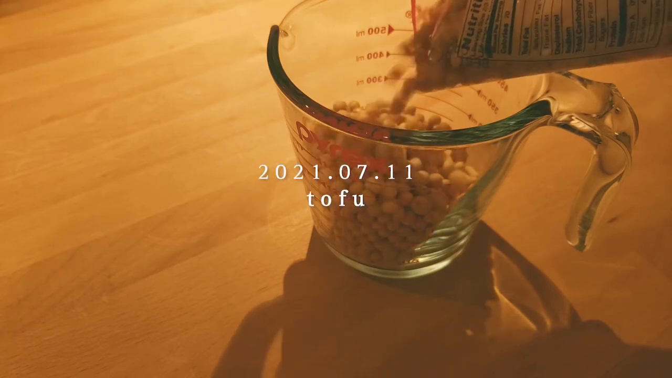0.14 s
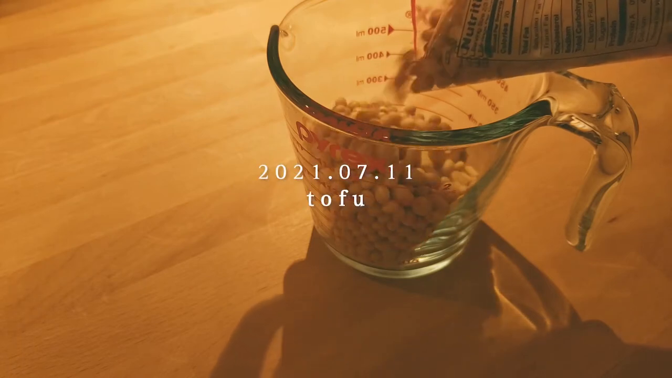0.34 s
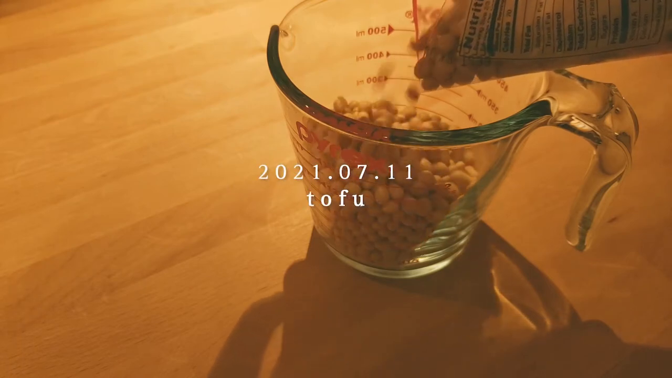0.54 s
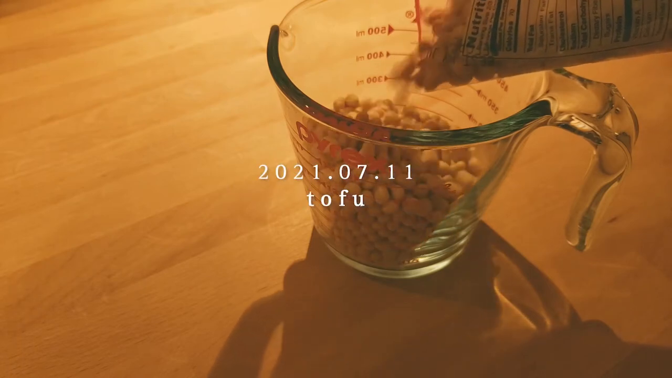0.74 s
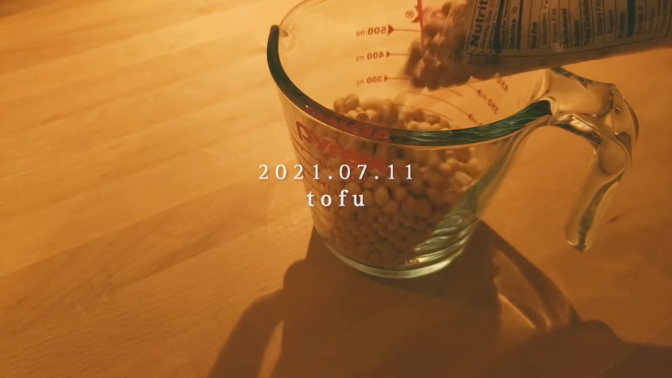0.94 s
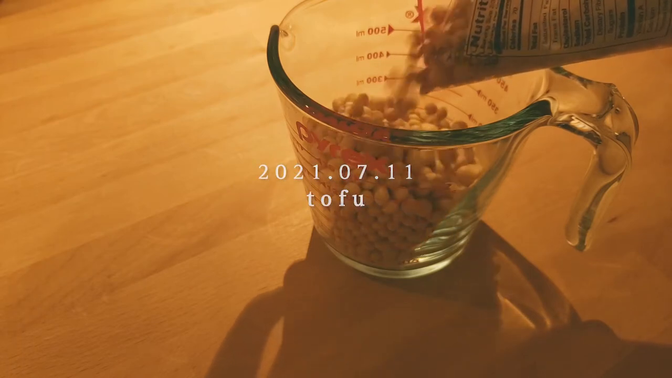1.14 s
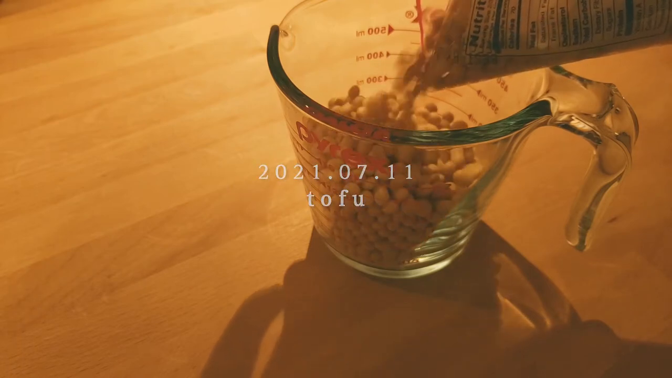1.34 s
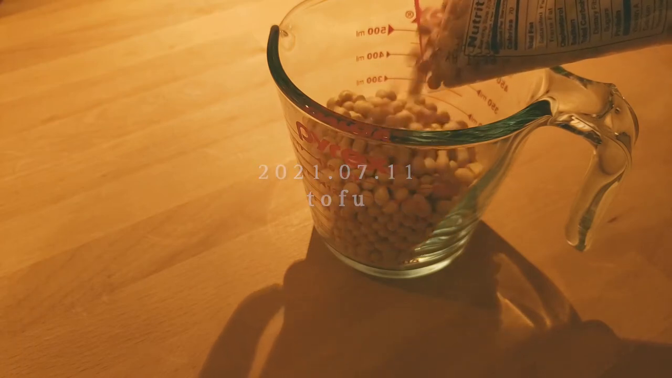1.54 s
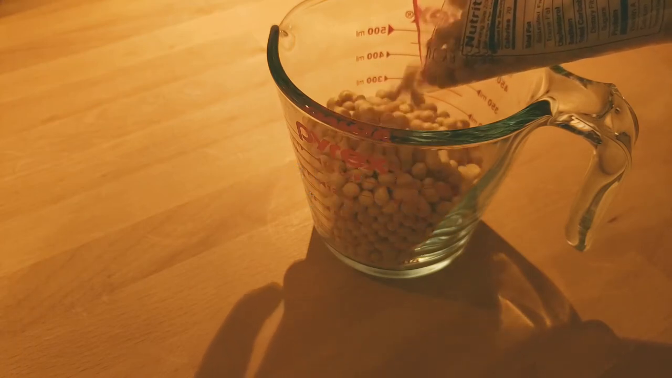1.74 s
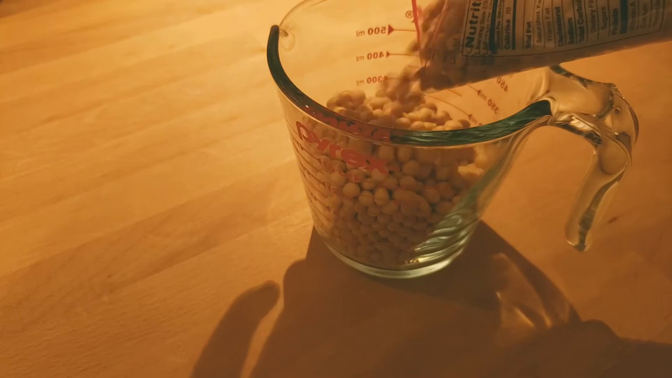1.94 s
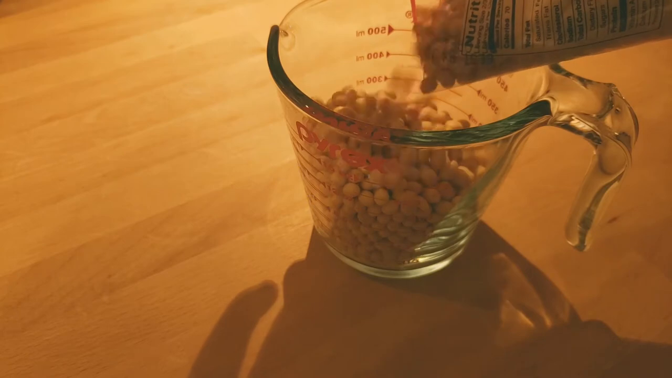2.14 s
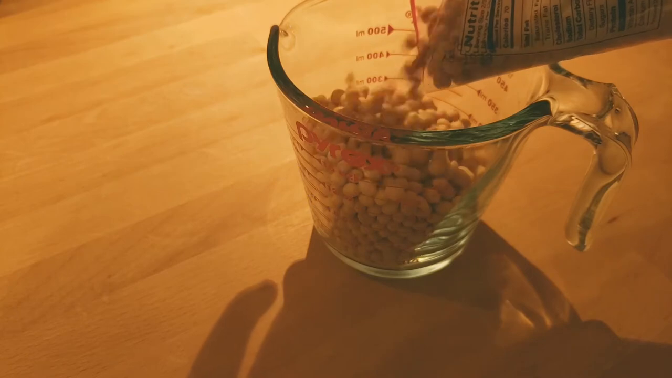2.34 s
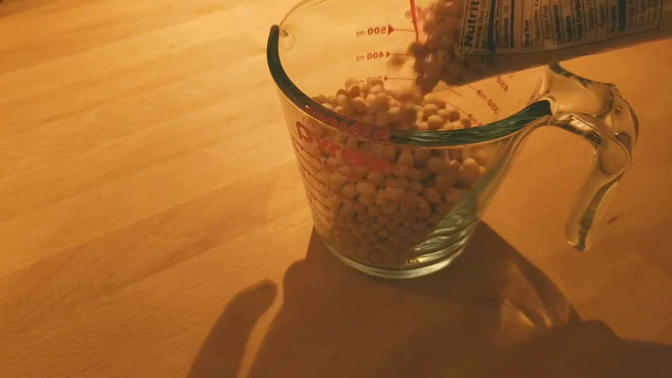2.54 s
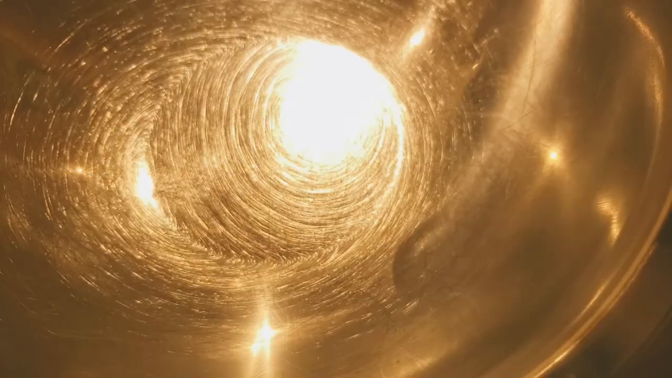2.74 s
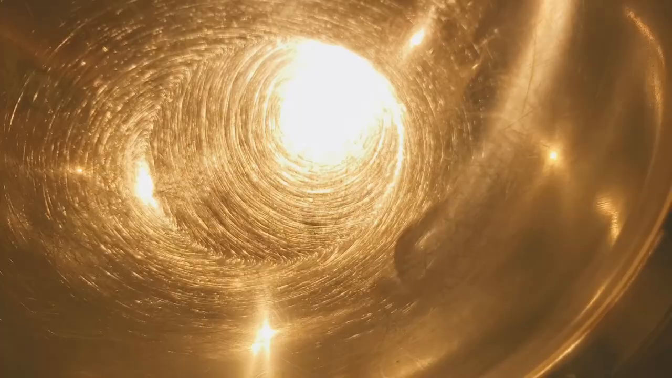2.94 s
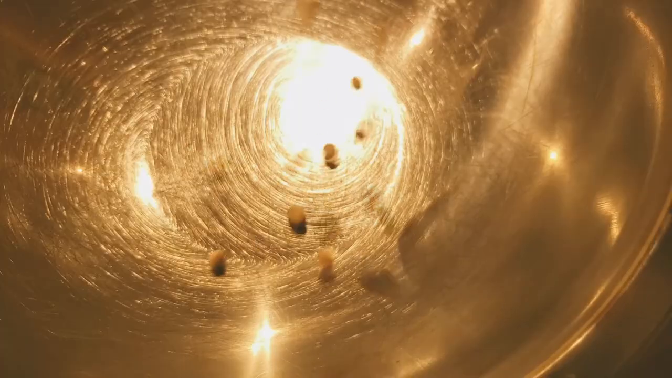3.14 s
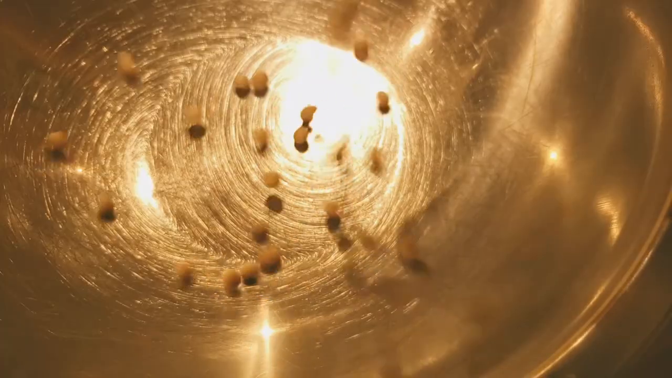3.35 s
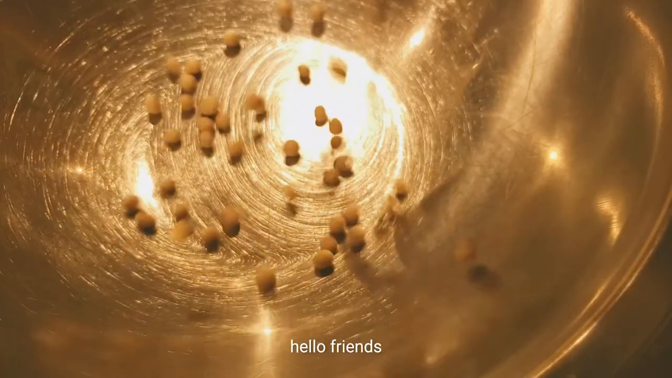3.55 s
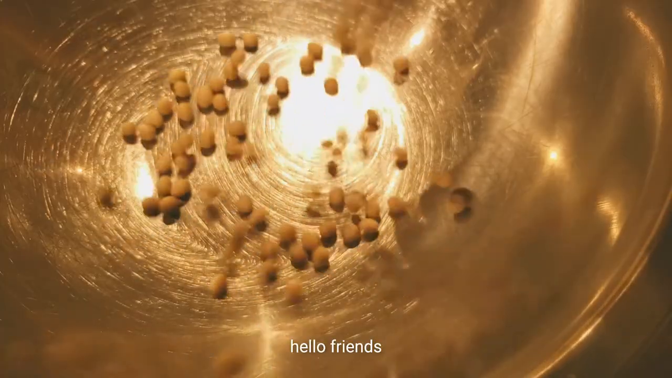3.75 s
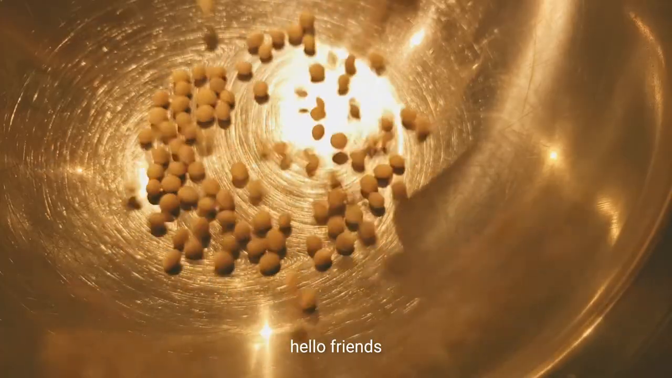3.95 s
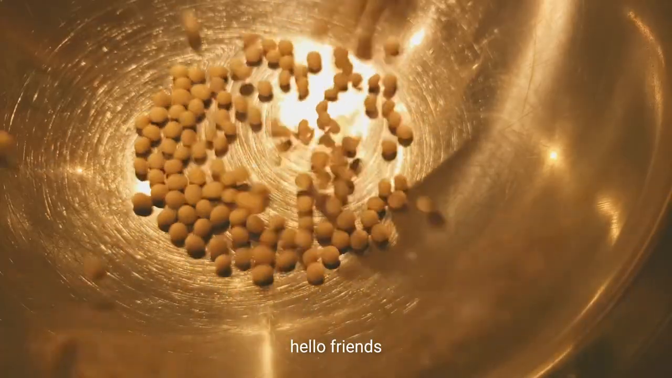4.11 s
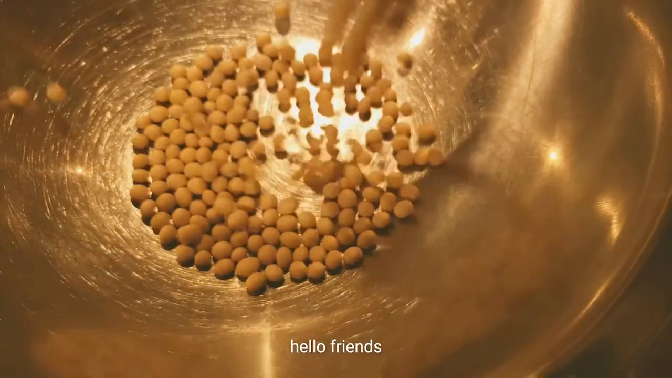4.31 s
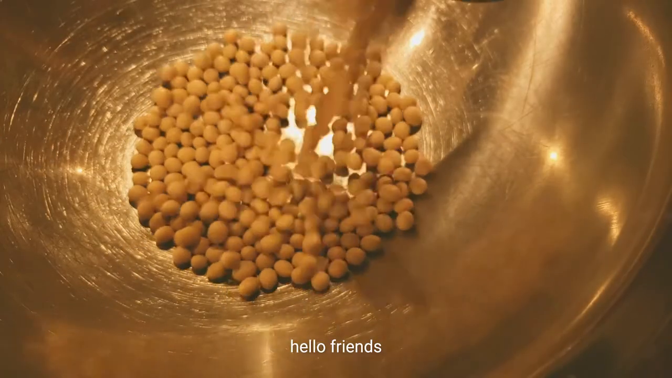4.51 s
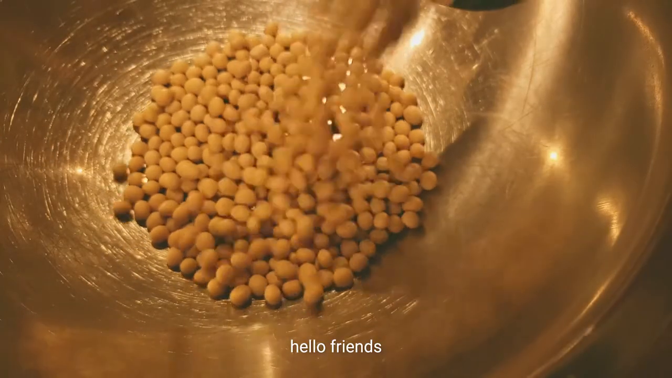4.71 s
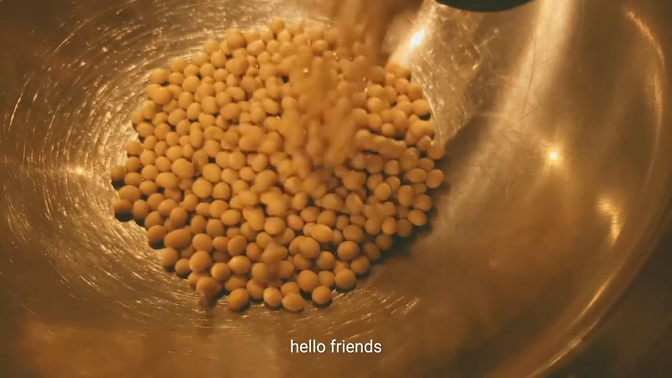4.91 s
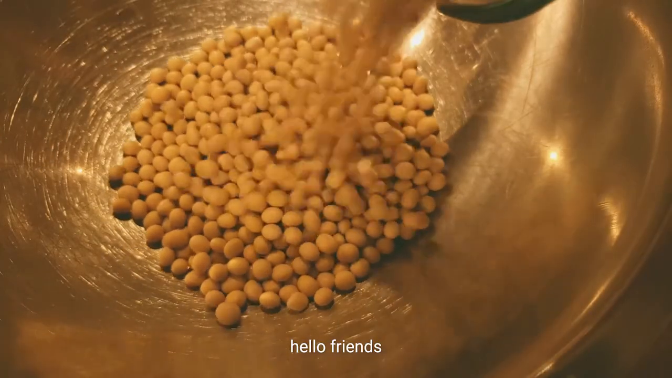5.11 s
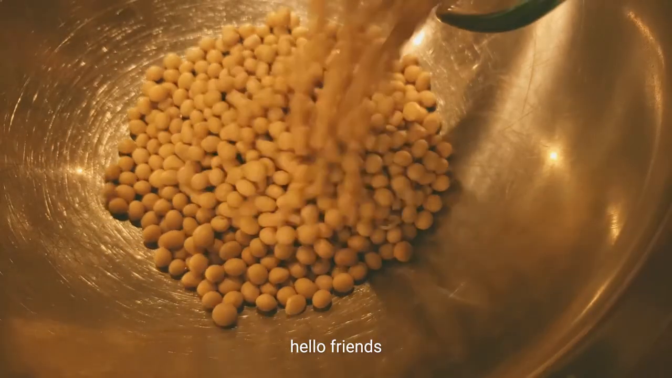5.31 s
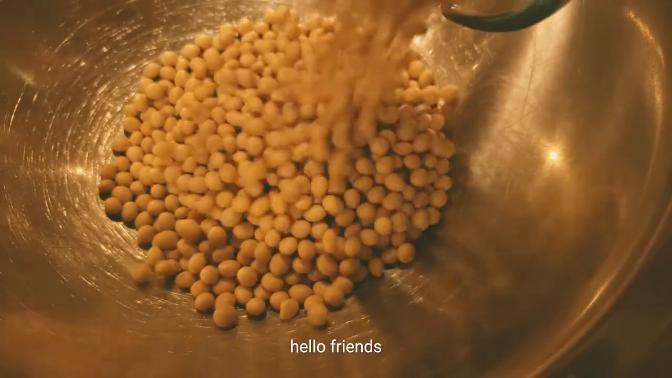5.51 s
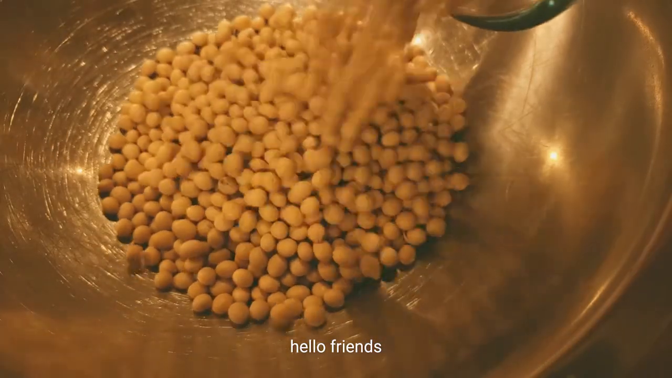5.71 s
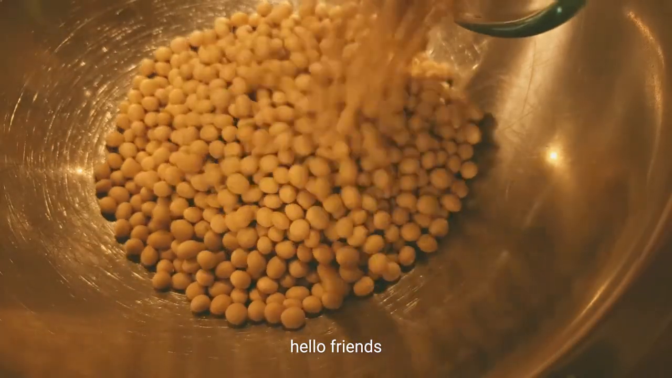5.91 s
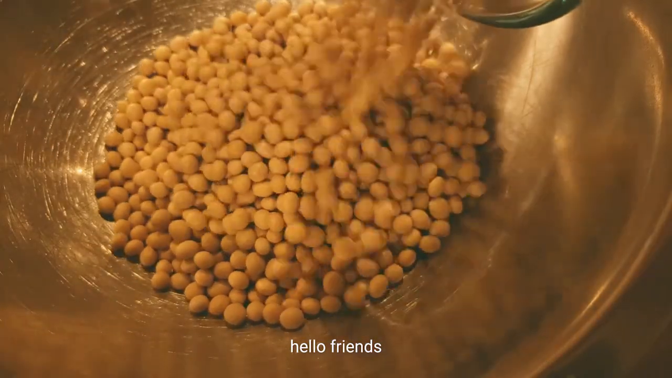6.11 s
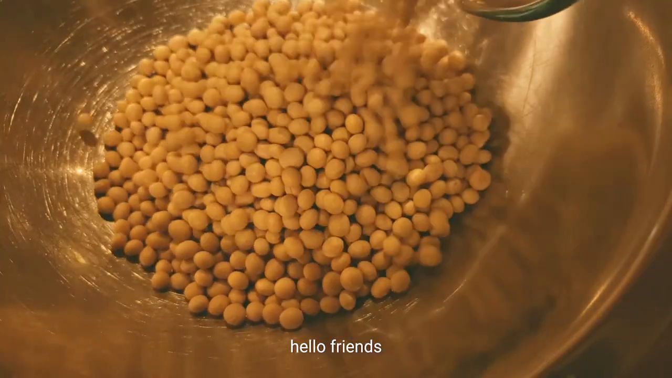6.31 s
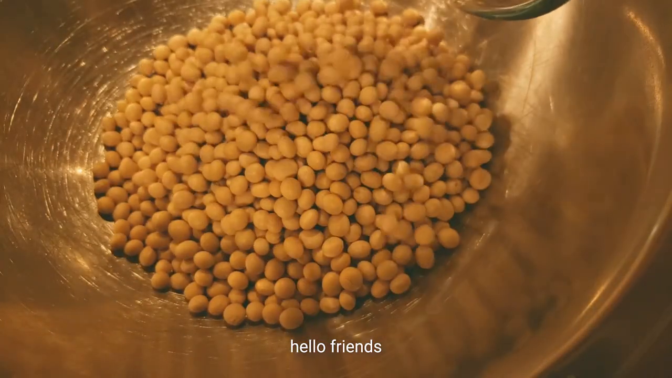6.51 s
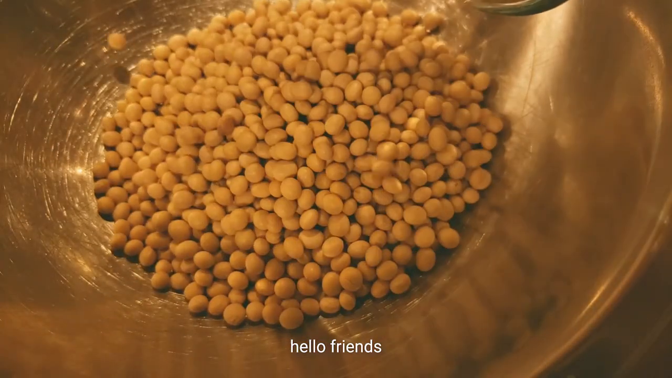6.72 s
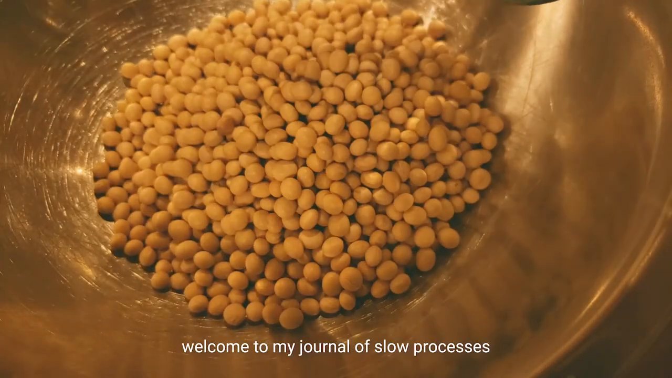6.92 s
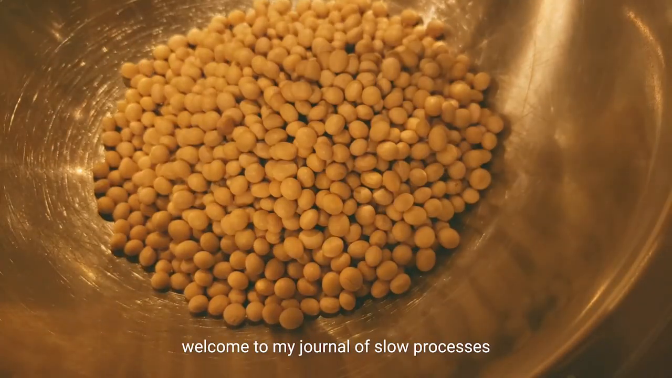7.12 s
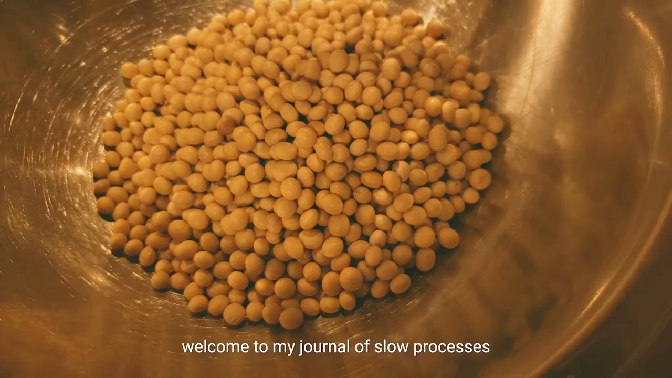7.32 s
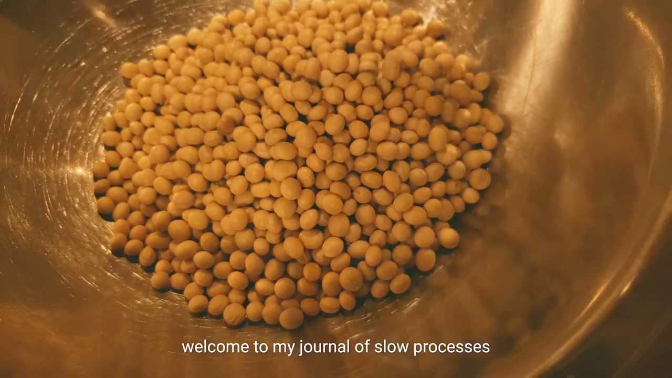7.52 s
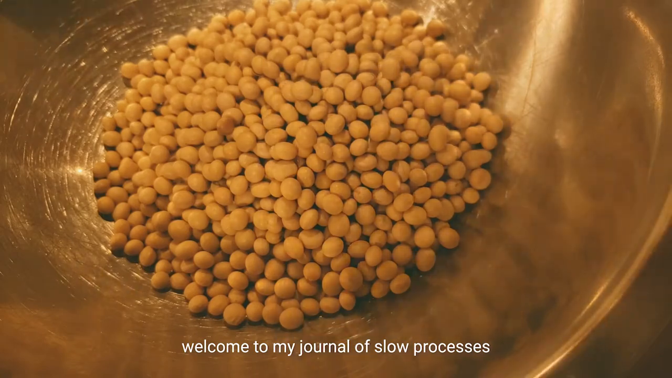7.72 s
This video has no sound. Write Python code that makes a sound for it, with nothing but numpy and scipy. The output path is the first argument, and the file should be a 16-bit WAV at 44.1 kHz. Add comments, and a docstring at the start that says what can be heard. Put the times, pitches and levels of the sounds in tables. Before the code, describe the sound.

A close, wide stereo pickup in a small kitchen, with a soft low motor hum and air underneath. From 0 to 2.7 seconds dried beans trickle quietly from a bag onto a heap in a glass cup: dull patter, fine dry rustle, sharp shell snaps and occasional high glass clinks. Around 2.65 to 2.95 beans slide over the glass lip with brighter, damped clinks. At about 2.95 the first beans strike a bare steel bowl, far louder, with sizzling ticks, hard knocks and a few low thumps on the counter. The uneven spurts thicken by 3.5 into a dense metallic clatter. From 4.3 to 5.5 the heap covers the steel and the rush grows softer and duller, with stray ricochets off the wall. After 6.3 it thins quickly to single ticks and small glass clinks, dying by 7.1. Only the faint hum remains until about 7.9.

```python
"""Beans patter and clink from a bag onto a heap in a glass cup; then the cup is tipped over a steel bowl.
The rush hammers the bare steel, softens as a heap covers it, and ends in single ticks.
Each bean contact is a short noise burst or a few dying tones, repeated in random showers and at set times.
Under it a kitchen appliance hums with wavering tones and filtered noise for air; a short room tail follows."""
import sys
import numpy as np
from scipy import signal
from scipy.fft import rfft, irfft, next_fast_len
from scipy.io import wavfile
from scipy.ndimage import uniform_filter1d

SR = 44100
rng = np.random.default_rng(int(sys.argv[2]) if len(sys.argv) > 2 else 0)


def transcribe(u):
    """Save the signal u as a 16-bit wav file named by the first command-line argument.

    u: samples, shape (n,) or (channels, n), limited to [-1, 1]; the rate is SR.
    q: integer samples, one column per channel.
    """
    v = np.clip(np.atleast_2d(u).T, -1, 1)
    q = np.round(v * 32767).astype(np.int16)
    wavfile.write(sys.argv[1], SR, q)


N = 346626  # length in samples
TIME = np.arange(N) / SR  # seconds

# All levels are relative: the functions below add their own offsets.
# stream from the cup into the bowl, spurting, steady, then running dry: (t/s, level below full flow/dB)
BOWL_FLOW = [(2.96, -22), (3.07, -7), (3.25, -3), (3.48, 0), (3.9, -1), (4.1, 0), (4.6, 0), (5.4, -4.5),
             (6.33, -5), (6.45, -11), (6.62, -18), (6.85, -28), (7.1, -66)]
# brief moments when the stream catches on the lip of the cup: (t/s, level change/dB)
JAMS = [(3.445, -12), (3.5, -9.5), (3.585, -7.5), (3.716, -8.5), (3.922, -4), (5.149, -3)]
# spurts of beans landing on the bare floor of the bowl: (t/s, level/dB, knock level/dB)
LANDINGS = [(2.9444, -4, -31), (2.9995, -5.5, -22.5), (3.0271, -6.5, -16.5), (3.043, -7, -33.5),
            (3.0817, -5, -21), (3.096, -8.5, -38), (3.1183, -11.5, -23), (3.14, -9.5, -28),
            (3.1578, -8, -21), (3.1707, -2.5, -20.5), (3.1993, -8, -27.5), (3.2124, -7.5, -32),
            (3.2238, -9.5, -32.5), (3.2542, -7.5, -36.5), (3.3004, -6.5, -26), (3.3618, -10, -47.5),
            (3.4097, -4, -38), (3.426, -9.5, -30), (3.46, -3.5, -20.5), (3.514, -5, -31),
            (3.5492, -5.5, -24), (3.5998, -7, -24.5), (3.6768, -9.5, -25.5), (3.685, -12.5, -30.5),
            (3.7289, -5, -33), (3.7386, -3, -22.5), (3.776, -7.5, -27), (3.7879, -7, -30.5),
            (3.8065, -6, -32), (3.8415, -11, -32), (3.9015, -7, -31.5), (3.9333, -5.5, -25),
            (3.958, -7.5, -36.5), (3.9917, -6.5, -34), (4.0454, -5, -21.5), (4.067, -3.5, -26),
            (4.1864, -2, -31), (4.2894, -11, -23.5), (4.3438, -7, -28.5), (4.3582, -2.5, -27.5),
            (4.4274, -12, -24.5), (4.505, -5, -27.5)]
# single beans leaping off the heap onto the bowl's wall: (t/s, level/dB, knock level/dB)
RICOCHETS = [(4.8589, -15.5, -33.5), (4.9776, -17, -32.5), (5.0305, -26, -33.5), (5.3586, -20, -28),
             (5.4784, -18.5, -37), (5.589, -12, -32), (5.687, -19.5, -44), (5.7744, -17, -43),
             (5.8578, -12, -54), (5.9324, -14.5, -52), (5.9908, -12, -46), (6.0804, -15.5, -31),
             (6.0954, -14.5, -41), (6.1952, -20, -48), (6.2577, -20.5, -44), (6.317, -17.5, -49),
             (6.346, -22, -47), (6.3834, -22, -42), (6.4466, -14, -57), (6.4823, -22, -45),
             (6.504, -20, -52), (6.538, -17.5, -42), (6.56, -20.5, -56), (6.6398, -12, -37),
             (6.72, -18, -45), (6.7565, -20.5, -55), (6.793, -25.5, -55), (6.8234, -36, -67)]
# hard blows that rock the bowl on the counter: (t/s, level/dB, left over right/dB)
THUMPS = [(2.999, -28.5, -21), (3.043, -44, 10), (3.225, -39, 7.5), (3.422, -44.5, -2), (3.515, -45, -6),
          (3.566, -44.5, 7.5), (3.651, -44, -9), (4.049, -40.5, -2.5), (4.629, -45, -14),
          (4.699, -49.5, -16), (4.818, -48.5, -13), (5.588, -44, -12), (5.9921, -29.5, -25),
          (6.447, -46, -19), (6.64, -40, -19)]
# low tones of the bowl: (f/Hz, level when empty/dB, level when loaded with beans/dB, t60/s)
BOWL_TONES = [(614, -26, -2.5, 0.03), (837, -5.5, -8.5, .02), (1176, -16.5, -1, 0.017),
              (1217, 0, -9.5, .028)]
# stream from the bag into the cup: (t/s, level/dB)
CUP_FLOW = [(0, -44.5), (.47, -47), (.58, -52), (.75, -46.5), (1.45, -46), (1.75, -49.5), (1.9, -44),
            (2.2, -48), (2.36, -46.5), (2.62, -47), (2.7, -67)]
# clumps landing on the heap in the cup: (t/s, level/dB)
CLUMPS = [(0.094, -37.5), (0.434, -38), (1.848, -35.5), (2.093, -36.5), (2.285, -34.5)]
# sharpest snaps of shell on shell in the cup: (t/s, level/dB)
SNAPS = [(0.1295, -37), (.4079, -29), (.5364, -32), (.605, -31), (.7176, -32), (.7329, -32), (.8204, -40),
         (.9347, -32), (1.7597, -34), (1.806, -36), (2.1644, -35), (2.3863, -29)]
# single beans on glass, each spot favouring the nearest tone: (t/s, level/dB, f/Hz)
CLINKS = [(0.051, -36, 6550), (.091, -38, 6550), (.127, -27, 6550), (.266, -35.5, 10570),
          (.329, -38, 10570), (0.48, -38.5, 10570), (0.607, -47, 4527), (1.005, -44, 4527),
          (1.024, -33.5, 7410), (1.069, -39, 10570), (1.569, -41, 10570), (1.624, -34, 10570),
          (1.699, -42, 3830), (1.933, -37, 6550), (2.116, -39.5, 4527), (2.366, -39, 10570),
          (2.664, -36.5, 3830), (2.749, -31.5, 3830), (2.774, -23.5, 13000), (2.856, -34, 3830),
          (2.872, -20, 7410), (2.919, -22.5, 7410), (6.186, -27, 11500), (6.298, -27, 11500),
          (6.34, -34, 11500), (6.481, -35, 11500)]
# beans sliding over the lip of the tipped cup: (t/s, length/s, level/dB)
SLIDES = [(2.628, 0.057, -43.5), (2.68, 0.29, -44), (5.764, .65, -55.5)]
# tones of the glass cup: (f/Hz, level/dB, t60 when free/s, level change when held in the hand/dB)
GLASS_TONES = [(3510, -10, .08, -12.5), (3830, -4, 0.1, 0), (4527, 2.5, 0.073, -12), (6550, -5.5, 0.14, -2),
               (7410, -7.5, 0.1, 6), (7940, -5, 0.058, -2.5), (10570, 5, 0.069, -3.5), (11500, 0, 0.14, -2),
               (13000, 1, .045, 5.5), (13820, 4.5, 0.036, 5.5), (14500, -6.5, .035, 1),
               (15000, 6.5, .035, -2.5), (15600, -5.5, 0.032, -0.5)]
# bright sizzle of the steel: (f/Hz, level per Hz/dB)
STEEL_COLOUR = [(3000, -33), (5200, -28), (5800, -7), (6400, 3), (7200, -1.5), (8100, -5), (9200, -8),
                (12000, -16), (16000, -17)]
# ticks of hard bean shells: (f/Hz, level per Hz/dB)
SHELL_COLOUR = [(1500, -26.5), (4000, -9), (7000, -7.5), (9500, -7.5), (11000, 1), (13000, -1.5),
                (16000, -3.5)]
# beans clacking and knocking in the bowl: (f/Hz, level per Hz/dB)
CLATTER_COLOUR = [(300, -25.5), (800, -25), (1500, -11.5), (2100, 1), (2800, 2), (4200, 3.5), (5500, 4),
                  (9000, -4)]
# low answer of the bowl: (f/Hz, level per Hz/dB)
BODY_COLOUR = [(100, -2.5), (200, -12.5), (330, -4), (480, -9), (610, 1.5), (700, 1.5), (840, 1.5),
               (980, -7.5), (1110, -4), (1180, 4.5), (1250, 8), (1340, 0), (1550, -6), (3000, -15.5)]
# jolt of the bowl against the counter: (f/Hz, level per Hz/dB)
THUD_COLOUR = [(20, -20.5), (45, 1.5), (110, 1), (250, -8.5), (600, -17.5), (1300, -20.5), (4000, -33.5)]
# dull patter of beans on beans: (f/Hz, level per Hz/dB)
PATTER_COLOUR = [(53, -49.5), (90, -8), (123, 1.5), (202, -6.5), (297, 0), (469, -5.5), (531, -0.5),
                 (644, -9.5), (868, -5), (1040, -15), (1520, -9.5), (1950, -13), (4150, -19), (4450, -25.5),
                 (6000, -28), (7800, -50.5), (13200, -120)]
# hollow of the cup above the heap: (f/Hz, level per Hz/dB)
HOLLOW_COLOUR = [(200, -18), (600, -12), (880, 4.5), (1020, 1.5), (1250, -1.5), (1500, -6), (2500, -22.5),
                 (4500, -11), (8000, -20.5)]
# small, light contacts between shells: (f/Hz, level per Hz/dB)
RUSTLE_COLOUR = [(1500, -39), (3000, -13), (5000, -4.5), (7000, -4.5), (9300, -4.5), (10700, -0.5),
                 (13000, 1.5), (15000, 3), (16000, 3)]
# moving air in the kitchen: (f/Hz, level per Hz/dB)
AIR_COLOUR = [(12, -30.5), (20, -26.5), (60, 2), (107, -19), (319, -6), (434, -15), (527, -18.5),
              (590, -26), (923, -24), (1910, -46), (2530, -32), (3250, -51.5), (11400, -59.5),
              (12800, -66.5), (16000, -65.5)]
# hum of the appliance; the first line takes its level from the next table: (f/Hz, rms level/dB)
HUM_LINES = [(59.2, -54), (123.8, -63), (177.6, -68), (242.2, -69), (312.2, -69.5), (349.9, -81.5),
             (527.6, -75.5), (640.6, -81.5)]
# background over time: (t/s, level of the lowest hum line/dB, level change of the rest/dB)
KITCHEN_LEVELS = [(0, -47, 4.5), (2.9, -49.5, 6), (3.2, -53, -1), (5.2, -74.5, -2), (6.5, -62, -1),
                  (7.1, -54.5, -1), (7.65, -52.5, 4), (7.86, -58.5, 2.5)]
# reverberation: (f/Hz, t60/s)
ROOM_DECAY = [(100, 0.16), (1000, 0.37), (4000, 0.37), (6500, 0.41), (9000, 0.3), (15000, 0.14)]
# stereo width of everything but the thumps: (f/Hz, gain of side against mid/dB)
WIDTH = [(60, -13), (120, -10), (200, -9.5), (400, -8), (700, -4.5), (1300, -2), (2400, -2), (4400, -0.5),
         (15000, 0)]
# overall lean of the stereo picture: (f/Hz, gain of left over right/dB)
LEAN = [(60, -1.4), (150, 0.5), (400, -0.5), (700, -2.5), (1300, -0.5), (2400, 1), (4400, -0.6), (15000, 1)]

# the heap starts to hide the steel, covers it, and at last is deep enough to deaden the clatter
HEAP_START_S, COVERED_S, DEEP_S = 4.3, 5.47, 6.29
# the rattle of a spurt bouncing about; it weakens as beans gather on the floor of the bowl
BOUNCE_DB, BOUNCE_S, BOUNCE_DB_PER_S = 7, .016, -6
JAM_S = .013  # time from the middle of a jam until its dB dip has shrunk to 1/e
LIFT_S = 2.64  # from here on the cup is held in the hand
EDGE_HZ = 15850  # upper end of the treble


def rush(steel_db=-24, shell_db=-22, clatter_db=-30.5, body_db=-49,
         covered_steel_db=-12, covered_shell_db=-10.0, deep_clatter_db=-13,
         body_follows=0.74, shell_follows=1.9, crowding=3.5):
    """The stream makes steel sizzle, beans clack and the bowl drone; the growing heap muffles all but the drone."""
    flow = stream()
    cover = ramp(TIME, HEAP_START_S, COVERED_S)
    depth = ramp(TIME, HEAP_START_S, DEEP_S)
    steel = flow * amp(steel_db + covered_steel_db * cover)
    shell = flow ** shell_follows * amp(shell_db + covered_shell_db * cover)
    clatter = stream(bounce_db=-3) * amp(clatter_db + deep_clatter_db * depth ** 2.06)
    body = flow ** body_follows * amp(body_db)
    # on the growing heap, each landing breaks up into many small contacts; a thin stream makes few
    crowd = np.interp(TIME, [3.9, 4.9], [1, crowding]) * np.clip(1.4 * curve(BOWL_FLOW), .12, 1)
    sizzle = shower(steel, per_s=300 * crowd, spread_db=3.0,
                    contact=lambda: burst(.0025, .006, -2), count=24)
    ticks = shower(shell, per_s=500 * crowd, spread_db=3.5,
                   contact=lambda: burst(0.0014, .005, -2), count=16)
    clacks = shower(clatter, per_s=330 * crowd, spread_db=3.2, contact=lambda: burst(0.0005, .004, -15))
    drone = shower(body, per_s=600 * crowd, spread_db=2.5, contact=lambda: burst(0.0036, 0.0051, 0.0))
    bright = tint(sizzle, STEEL_COLOUR) + tint(ticks, SHELL_COLOUR)
    return bright + tint(clacks, CLATTER_COLOUR) + tint(drone, BODY_COLOUR)


def stream(bounce_db=0):
    """How hard beans rain on the bowl: the flow plus the dying bounces of each spurt, cut by brief jams."""
    jams = amp(sum(db * np.exp(-((TIME - s) / JAM_S) ** 2) for s, db in JAMS))
    power = curve(BOWL_FLOW)[None] ** 2
    t = TIME[:SR // 4]
    for s, db, _ in LANDINGS:
        age = s - LANDINGS[0][0]
        bounce = amp(db + BOUNCE_DB + bounce_db + BOUNCE_DB_PER_S * age)
        add(power, s, (bounce * np.exp(-t / BOUNCE_S))[None] ** 2)
    return jams * np.sqrt(power[0])


def strikes(ring_db=-6.0, ring_db_per_s=-5, tick_db=-7, knock_db=1.5, body_db=-12,
            wall_ring_db=-3.0, wall_tick_db=-15, wall_knock_db=0):
    """Beans hit bare steel: knock, tick, ring and low answer; gathering beans damp the floor, not the wall."""
    hits = []
    for s, db, knock in LANDINGS:
        age = s - LANDINGS[0][0]
        hits.append((s, db + ring_db + ring_db_per_s * age, db + tick_db, knock + knock_db))
    for s, db, knock in RICOCHETS:
        hits.append((s, db + wall_ring_db, db + wall_tick_db, knock + wall_knock_db))
    rings, ticks, knocks, bowl = np.zeros((4, 2, N))
    for s, ring, tick, knock in hits:
        add(rings, s, amp(ring) * burst(.003, .007, -3))
        add(ticks, s, amp(tick) * burst(.002, .006, -2))
        add(knocks, s, amp(knock) * push(-5, .0008, .004, -20))
        add(bowl, s, amp(knock + body_db) * burst(0.002, 0.025, -2))
    bright = tint(rings, STEEL_COLOUR) + tint(ticks, SHELL_COLOUR)
    return bright + tint(knocks, CLATTER_COLOUR) + tint(bowl, BODY_COLOUR)


def bowl_tone(empty_db=-47.0, loaded_db=-51, follows=.7):
    """The rain of beans keeps the low tones ringing; their balance changes under the weight of the heap."""
    level = stream() ** follows
    load = ramp(TIME, HEAP_START_S, DEEP_S)
    empty = shower(level * np.sqrt(1 - load), per_s=400, spread_db=2.5,
                   contact=lambda: toll(False), count=6)
    loaded = shower(level * np.sqrt(load), per_s=400, spread_db=4,
                    contact=lambda: toll(True), count=6)
    return amp(empty_db) * empty + amp(loaded_db) * loaded


def toll(loaded, detune=.035, size=4000):
    """One blow on the bowl's low tones, as mid and side; their pitch differs a little from spot to spot."""
    t = np.arange(size) / SR
    hz, empty_db, loaded_db, t60 = np.transpose(BOWL_TONES)[:, :, None]
    pitch = hz * (1 + detune * rng.uniform(-1, 1, (2, len(hz), 1)))
    weight = amp(loaded_db if loaded else empty_db) * rng.choice([-1, 1], pitch.shape)
    decay = np.exp(-np.log(1000) * t / t60)
    return (weight * decay * np.sin(2 * np.pi * pitch * t)).sum(1)


def thumps(thump_db=11, rock_db=-11, rock_hz=70, rock_s=0.016):
    """Hard blows jolt the bowl against the counter: one push, a short shudder and a low rocking."""
    jolts, rocks = np.zeros((2, 2, N))
    t = TIME[:SR // 5]
    rock = np.sin(2 * np.pi * rock_hz * t) * np.exp(-t / rock_s)
    rock_mid_side = np.array([rock, 0 * rock])
    for s, db, left_db in THUMPS:
        add(jolts, s, amp(db + thump_db) * pan(push(-9, .003, .013, -6), left_db))
        add(rocks, s, amp(db + rock_db) * pan(rock_mid_side, left_db))
    return tint(jolts, THUD_COLOUR) + rocks


def cup(patter_db=2, hollow_db=-3, rustle_db=1, ticks_db=-1, glass_db=-10, snap_db=1, clump_db=4):
    """Beans fall a short way onto beans: a dull patter, a fine rustle and dry ticks; some graze the glass."""
    flow = curve(CUP_FLOW)
    heap = amp(patter_db) * shower(flow, per_s=830, spread_db=1.0,
                                   contact=lambda: burst(0.0025, 0.0051, -2))
    clumps = amp(hollow_db) * shower(flow, per_s=200, spread_db=1.5,
                                     contact=lambda: burst(.002, .006, -3))
    for s, db in CLUMPS:
        add(clumps, s, amp(db + clump_db) * burst(0.005, 0.0097, -2))
    shells = amp(rustle_db) * shower(flow, per_s=3100, spread_db=4,
                                     contact=lambda: burst(0.0008, 0.0027, -9.5))
    shells += amp(ticks_db) * shower(flow, per_s=29, spread_db=-2.0,
                                     contact=lambda: burst(.0005, 0.0035, -6.5))
    for s, db in SNAPS:
        add(shells, s, amp(db + snap_db) * burst(0.00068, 0.0041, -6))
    grazes = shower(flow, per_s=210, spread_db=4.0, contact=lambda: ping(soft_hz=11000), count=8)
    beans = tint(heap, PATTER_COLOUR) + tint(clumps, HOLLOW_COLOUR) + tint(shells, RUSTLE_COLOUR)
    return beans + amp(glass_db) * grazes


def glass_wall(clink_db=-3, tick_db=-7, slide_db=0.0, scrape_db=-3, roll_db=-4, fade_s=0.024):
    """Beans knock hard on the glass, and roll softly over its lip with a dry scrape."""
    sliding = np.zeros(N)
    for s, length, db in SLIDES:
        end = s + length
        sliding += amp(db) * ramp(TIME, s, s + fade_s) * ramp(TIME, end, end - fade_s)
    rings = amp(slide_db) * shower(sliding, per_s=130, spread_db=2,
                                   contact=lambda: ping(held=1, soft_hz=1500))
    scrape = shower(sliding, per_s=740, spread_db=-5, contact=lambda: burst(.0006, 0.001, -22.5))
    ticks = amp(scrape_db) * scrape
    for s, db, spot_hz in CLINKS:
        held = float(s > LIFT_S)
        add(rings, s, amp(db + clink_db) * ping(held, spot_hz, spot_db=5))
        add(ticks, s, amp(db + tick_db) * burst(.002, .005, -5))
    return rings + tint(ticks, RUSTLE_COLOUR) + amp(roll_db) * tint(scrape, PATTER_COLOUR)


def ping(held=0, spot_hz=3450, spot_db=0, soft_hz=40000, size=6000):
    """One blow on glass: paired tones, damped by a hand, one favoured by the spot, dulled by a soft contact."""
    t = np.arange(size) / SR
    # listing the tones twice makes each one a close pair
    hz, db, t60, held_db = np.transpose(GLASS_TONES + GLASS_TONES)[:, :, None]
    damping = 1 + 1.82 * held
    split = 1 + .003 * damping * rng.uniform(-1, 1, (2, len(hz), 1))
    distance = abs(hz - spot_hz)
    favoured = distance == distance.min()
    weight = amp(db + held * held_db + spot_db * favoured) / (1 + (hz / soft_hz) ** 2)
    wave = np.sin(2 * np.pi * (hz * split * t + rng.random(split.shape)))
    modes = weight * wave * np.exp(-np.log(1000) * damping * t / t60)
    ring = modes.sum(1) * (1 - np.exp(-t / 0.0004))  # soft onset
    return ring / np.sqrt(np.mean(ring[:, :SR // 300] ** 2))  # the first 3.3 ms set the level


def shower(level, per_s, spread_db, contact, count=10):
    """Beans of random force land at random moments on several spots; the rms follows level."""
    landed = rng.random(N) < per_s / SR
    force = amp(spread_db * np.minimum(rng.exponential(1, N), 4)) * landed
    power = uniform_filter1d(force ** 2, SR // 12)
    # evening out the local power; the added floor keeps sparse moments from being boosted too far
    blows = level * force / np.sqrt(abs(power) + per_s / SR / 2) * rng.choice([-1, 1], N)
    spot = rng.integers(0, count, N)
    out = np.zeros((2, N))
    for k in range(count):
        sound = contact()
        sound = sound / np.sqrt((sound ** 2).sum() / 2)
        out += signal.oaconvolve((blows * (spot == k))[None], sound, axes=1)[:, :N]
    return out


def burst(crack_s, ring_s, ring_db, size=4096):
    """One contact as mid and side noise: a crack, then a dying ring; the energy of 1 ms at full level."""
    t = np.arange(size) / SR
    shape = np.exp(-t / crack_s) + amp(ring_db) * np.exp(-t / ring_s)
    return unit(shape * rng.standard_normal((2, size))) * np.sqrt(SR / 1000 / size)


def push(shudder_db, crack_s, ring_s, ring_db):
    """One clean blow, as mid and side: a single push with a weaker shudder."""
    blow = amp(shudder_db) * burst(crack_s, ring_s, ring_db)
    blow[0, 0] += np.sqrt(SR / 1000)
    return blow


def kitchen(air_db=-57, hum_db=0, waver=.18):
    """Moving air as coloured noise, and the wavering lines of a motor."""
    s, lowest_db, rest_db = np.transpose(KITCHEN_LEVELS)
    lowest = amp(np.interp(TIME, s, lowest_db))
    level = amp(np.interp(TIME, s, rest_db))
    out = amp(air_db) * level * tint(rng.standard_normal((2, N)), AIR_COLOUR, size=16384)
    knots = np.linspace(0, TIME[-1], 50)
    for k, (hz, db) in enumerate(HUM_LINES):
        # a complex sway moves both loudness and phase
        wander = rng.standard_normal(len(knots)) + 1j * rng.standard_normal(len(knots))
        sway = 1 + waver * np.interp(TIME, knots, wander)
        line = np.sqrt(2) * (sway * np.exp(2j * np.pi * (hz * TIME + rng.random()))).real
        out[0] += line * (lowest if k == 0 else level * amp(db + hum_db))
    return out


def room(x, delay_s=0.00057):
    """A diffuse tail of noise, each band dying at its own speed."""
    hz, t, z = signal.stft(rng.standard_normal((2, SR)), SR, nperseg=256)
    decay = np.exp(-np.log(1000) * t / read(ROOM_DECAY, hz)[:, None])
    tail = signal.istft(z * decay, SR, nperseg=256)[1]
    # silent for one delay, then fading in over another
    tail = tail * np.clip(np.arange(tail.shape[1]) / SR / delay_s - 1, 0, 1)
    return signal.fftconvolve(x, tail / np.linalg.norm(tail[0]), axes=1)[:, :N]


def amp(db):
    """Turns decibels into a gain."""
    return 10 ** (np.asarray(db) / 20)


def unit(x):
    """Scales to an rms of 1."""
    return x / np.sqrt(np.mean(x ** 2) + 1e-20)


def read(points, hz):
    """A spectrum joined by straight lines over log frequency."""
    f, value = np.transpose(points)
    return np.interp(np.log(hz + 1), np.log(f + 1), value)


def curve(rows):
    """A gain that follows (t/s, level/dB) rows, silent outside them."""
    s, db = np.transpose(rows)
    return amp(np.interp(TIME, s, db)) * (TIME >= s[0]) * (TIME <= s[-1])


def ramp(t, start_s, end_s):
    """Goes from 0 at the first moment to 1 at the second, in either order."""
    return np.clip((t - start_s) / (end_s - start_s), 0, 1)


def add(mix, s, sound):
    """Mixes a sound in at s seconds, cutting what runs past the end."""
    part = mix[:, max(round(s * SR), 0):][:, :sound.shape[1]]
    part += sound[:, :part.shape[1]]


def tint(x, points, size=4096):
    """Causal filter with the given spectrum; keeps the power of white noise."""
    log_gain = np.log(unit(amp(read(points, abs(np.fft.fftfreq(size, 1 / SR))))))
    # the Hilbert transform supplies the phase that puts the energy as early as possible
    taps = np.fft.ifft(np.exp(np.conj(signal.hilbert(log_gain)))).real[:size // 2]
    return signal.oaconvolve(x, taps[None], axes=1)[:, :x.shape[1]]


def pan(x, left_db):
    """Moves a mid and side pair towards the left, or the right if negative."""
    return x + np.tanh(left_db * np.log(10) / 40) * x[::-1]


def scene(cup_room_db=-13, bowl_room_db=-10, cup_left_db=-2.5):
    """Both pours in the kitchen, turned from mid and side into left and right; the treble is widest."""
    bowl = rush() + bowl_tone() + strikes()
    glass = pan(cup(), cup_left_db) + glass_wall()
    wet = room(amp(cup_room_db) * glass + amp(bowl_room_db) * bowl)
    size = next_fast_len(N)
    hz = np.fft.rfftfreq(size, 1 / SR)
    width = np.array([np.ones(len(hz)), amp(read(WIDTH, hz))])
    lean = amp(read(LEAN, hz) / 2)  # half the lean on each side
    mid, side = width * rfft(glass + bowl + wet + kitchen(), size) + rfft(thumps(), size)
    return irfft(np.array([(mid + side) * lean, (mid - side) / lean]), size)[:, :N]


def record(dry):
    """A steep low-pass takes away the treble above EDGE_HZ."""
    taps = signal.firwin(401, EDGE_HZ, window=("kaiser", 8), fs=SR)
    return signal.oaconvolve(dry, taps[None], "same", axes=1)


dry = scene()
out = record(dry)
transcribe(out)
```